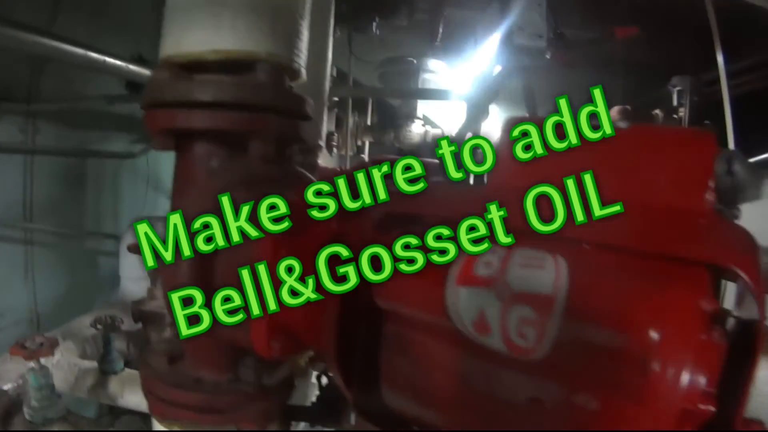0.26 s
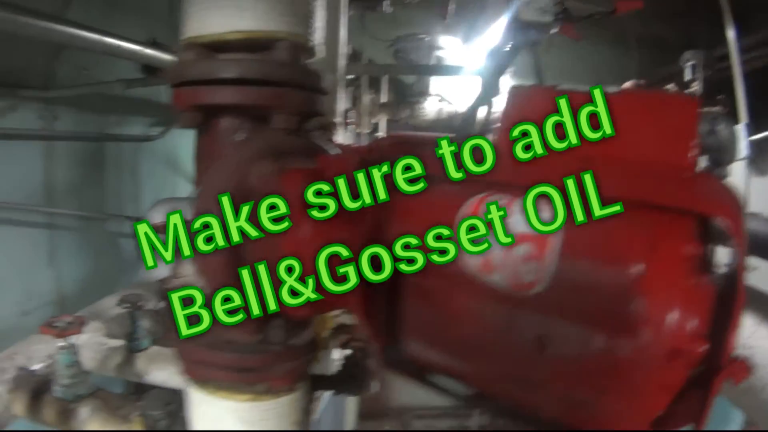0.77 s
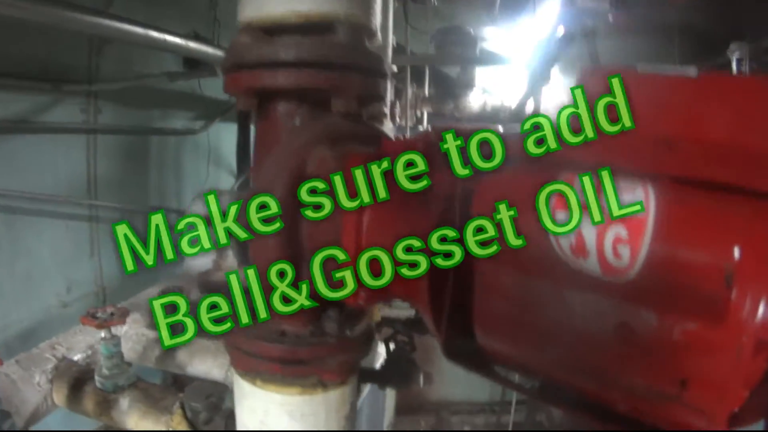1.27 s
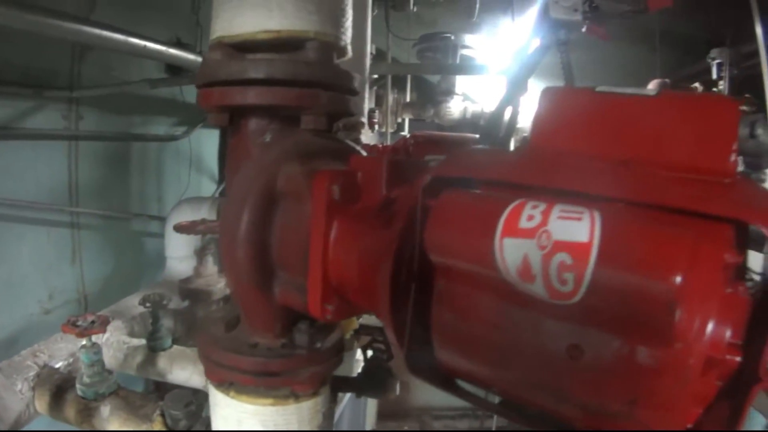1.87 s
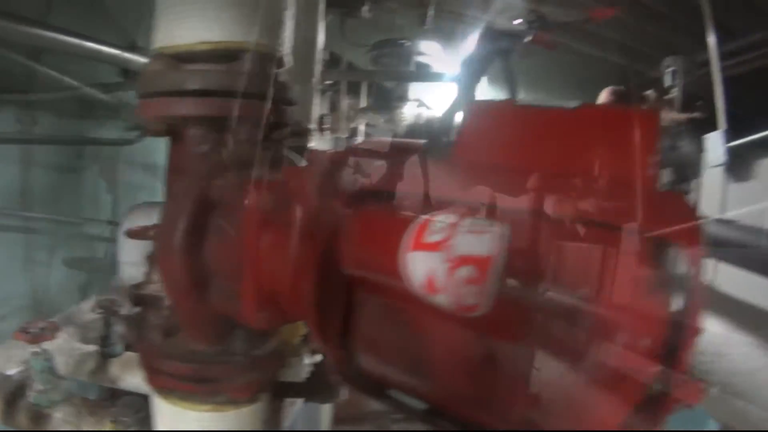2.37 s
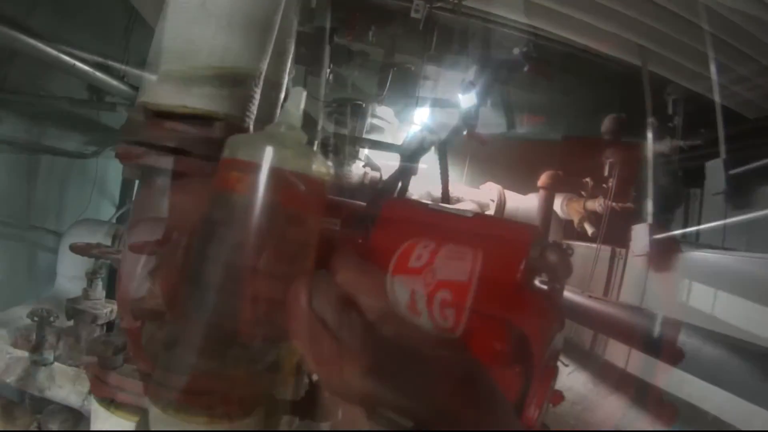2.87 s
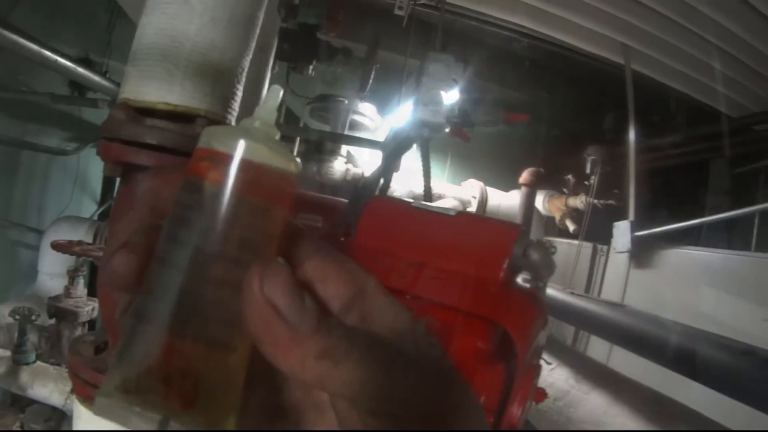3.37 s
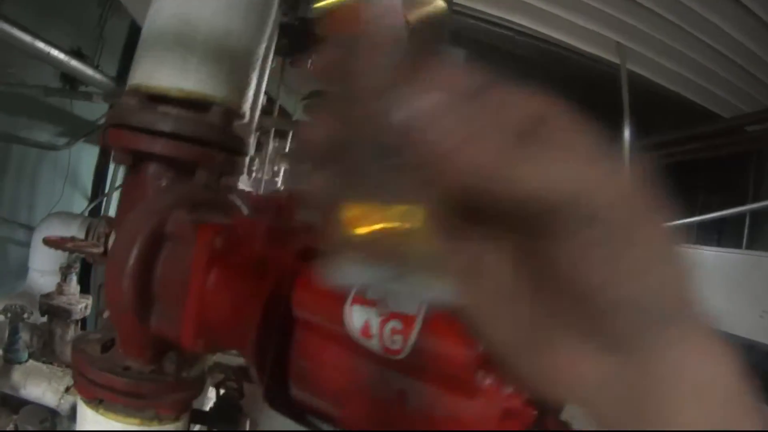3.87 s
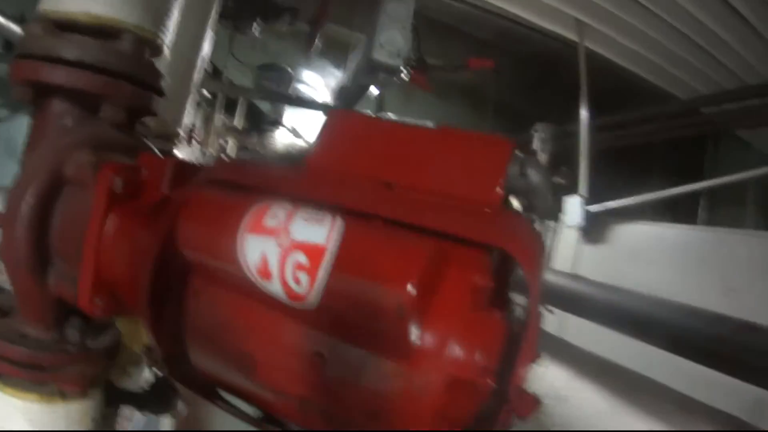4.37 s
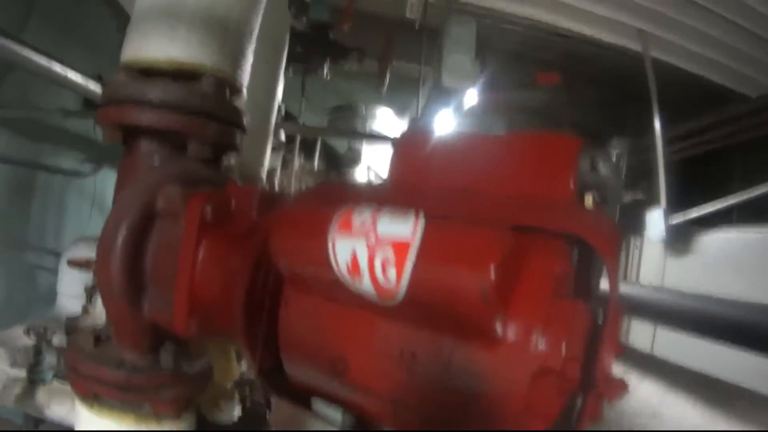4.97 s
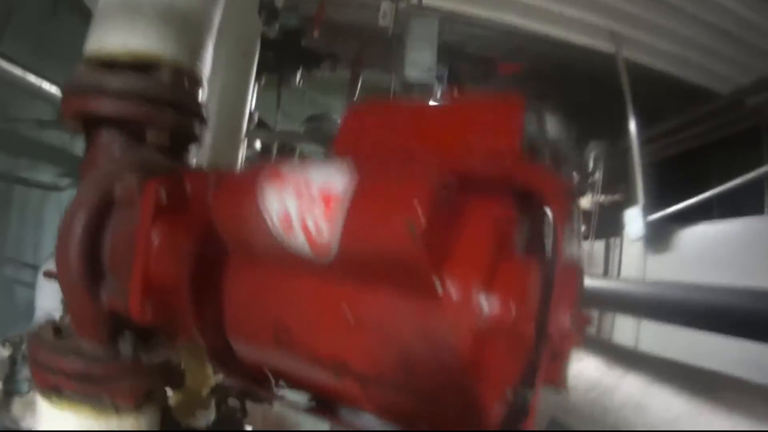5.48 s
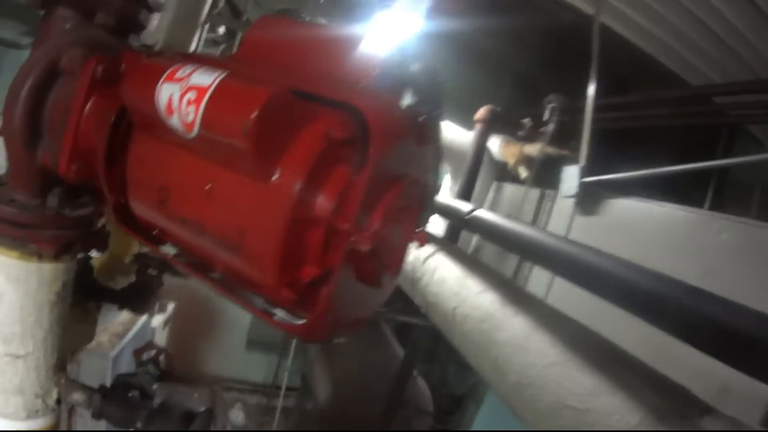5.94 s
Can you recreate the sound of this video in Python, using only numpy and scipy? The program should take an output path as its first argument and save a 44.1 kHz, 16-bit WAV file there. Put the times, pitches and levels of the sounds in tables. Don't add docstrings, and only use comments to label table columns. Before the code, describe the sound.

In a hard, echoing mechanical room, circulator pumps run with watery hiss, low motor hum, faint whine and a bearing rasping about three times a second. A tool clatters near the start, with a lighter tap after. The pump sound softens as the viewpoint changes, fingers tap and rub the hand-held camera, then loud knocks and clicks burst close up. A tiny silence follows before the pumps return.

```python
import sys
import numpy as np
from scipy import signal
from scipy.fft import rfft, irfft, next_fast_len
from scipy.io import wavfile
from scipy.ndimage import uniform_filter1d

SR = 44100
rng = np.random.default_rng(int(sys.argv[2]) if len(sys.argv) > 2 else 0)


def materialize(psi):
    bounded = np.clip(np.atleast_2d(psi).T, -1, 1)
    quanta = np.round(bounded * 32767).astype(np.int16)
    wavfile.write(sys.argv[1], SR, quanta)


def boost_factor(decibels):
    exponent = np.asarray(decibels, float) / 20
    return 10 ** exponent


N = 273861
T = np.arange(N) / SR
M = next_fast_len(N + SR // 4)
F = np.fft.rfftfreq(M, 1 / SR) + 1
SIDE = np.array([[.5], [-.5]])


def curve(table):
    s, level = np.transpose(table)
    return np.interp(T, s, level)


def along(table):
    hz, *columns = np.transpose(table)
    return [np.interp(np.log(F), np.log(hz), c) for c in columns]


def unit(x):
    return x / np.sqrt(np.mean(x ** 2))


def ramp(s, length):
    return np.clip((T - s) / length, 0, 1)


def lopsided(u, rise, fall):
    return np.exp(-(u / np.where(u < 0, rise, fall)) ** 2)


def modes(table):
    return sum(boost_factor(db) ** 2 / (1 + (2 * (F - hz) / width) ** 2) ** 2 for hz, width, db in table)


def shaped(x, power):
    return irfft(rfft(x, M) * np.sqrt(power), M)[..., :N]


def walk(rate):
    k = int(SR / rate)
    held = np.repeat(rng.standard_normal(N // k + 1), k)
    return unit(uniform_filter1d(held, k)[:N])


def noises():
    return rng.standard_normal((3, N))


def band_noise(grit, low_hz, high_hz, order=2):
    band = signal.butter(order, [low_hz, high_hz], "band", fs=SR, output="sos")
    return signal.sosfilt(band, grit)


def add(out, s, sound):
    i = max(int(s * SR), 0)
    out[..., i:i + sound.shape[-1]] += sound[..., :N - i]


# (frequency [Hz], coherence [0-1], left leads [rad], left minus right [dB])
PORT_PAIR = [(29.6, 1, 0.19, -22), (120, 0.98, -0.23, 4.5), (250, 0.93, -0.84, 0), (500, 1, -1.64, -0.5),
             (970, 0.03, -1.04, -2), (1580, 0.74, -0.54, -4), (2230, 0.6, -0.88, -1),
             (3200, 0.61, -0.25, -3), (5240, 0.94, -0.41, -2), (8450, 0.2, 1, 0), (9750, 0.99, 0.89, 0)]


def ports(shared, left, right):
    like, lead, pan_db = along(PORT_PAIR)
    like = np.clip(like, 0, 1)
    turn = np.array([np.exp(.5j * lead), np.exp(-.5j * lead)])
    both = np.sqrt(like) * rfft(shared, M) * turn
    both = both + np.sqrt(1 - like) * rfft([left, right], M)
    return irfft(both * boost_factor(SIDE * pan_db), M)[:, :N]


# (frequency [Hz], density [dB per Hz])
WATER_HISS = [(12, -51), (20, -21.5), (117, -11), (198, -13), (327, -11.5), (781, -16.5), (939, -14.5),
              (1190, -13.5), (1470, -3), (1680, -9), (1960, -7), (3420, -13), (4810, -8.5), (7740, -18.5),
              (10900, -14), (14200, 40), (22000, -120)]
# (frequency [Hz], width [Hz], level over the hiss [dB])
CASING_MODES = [(121, 22, 7), (184, 90, -2.5), (942, 24, 7), (1060, 12, -1), (721, 14, 4), (2500, 25, 1.5),
                (2820, 14, 2), (1527, 71, 1), (1570, 14, -12), (1912, 150, 4), (2000, 110, 4.5),
                (2128, 130, 5), (2250, 200, 1.5), (3177, 250, 2.5), (6820, 2000, -3.5), (9450, 420, 3),
                (11190, 1600, 3.5)]
RING_DB = -.5
HUM_DB, HUM_NEARER_DB = -4.5, -0.5
CROSS_S, CROSS_LENGTH_S = 2.9, 0.43


def casing_hiss():
    hum_db = HUM_DB + HUM_NEARER_DB * ramp(CROSS_S, CROSS_LENGTH_S)
    smooth = boost_factor(along(WATER_HISS)[0]) ** 2
    scale = 1 / np.sqrt(np.mean(smooth * (F > 5600) * (F < 9000)))
    noise = rfft(ports(*noises()), M) * np.sqrt(smooth * (1 + modes(CASING_MODES)))
    swell, out = walk(12), 0
    for hz in 25 * 2 ** np.arange(0, 9, .5):
        band = np.clip(1 - np.abs(2 * np.log2(F / hz)), 0, 1)
        share_db = hum_db if hz < 700 else RING_DB if hz < 3500 else 0
        flicker_db = .5 * swell + 1.27 * walk(14)
        out = out + boost_factor(share_db + flicker_db) * irfft(noise * band, M)[:, :N]
    return scale * out


# (frequency [Hz], width [Hz], level [dB])
BEARING_MODES = [(4820, 53, -1), (4780, 260, 2.5), (4950, 90, 0), (5200, 100, -7), (4315, 60, -2.5),
                 (4630, 70, 1)]
# (from time [s], a rasp begins at [s])
BEAT_PHASE = [
    (0, -.055),
    (3.3, 3.435),
    (4.84, 4.66),
    (4.96, 5.045),
    (5.3, 5.34),
    (5.545, 5.5),
    (5.72, 5.815),
    (6.0, 5.93),
    (6.065, 5.82),
    (6.09, 6.16),
]
BEAT_HZ = 3.105
RASP_SAG_DB = -3.5


def bearing_rasp():
    phase = np.array(BEAT_PHASE)
    start = phase[np.searchsorted(phase[:, 0], T, side="right") - 1, 1]
    turn = (T - start) * BEAT_HZ % 1
    beat = np.clip(turn / .07, 0, 1) * np.clip((.72 - turn) / .22, 0, 1)
    beat = beat * boost_factor(1.5 * walk(40) + RASP_SAG_DB * (turn - 0.28))
    return beat * unit(shaped(ports(*noises()), modes(BEARING_MODES)))


# (frequency [Hz], level [dB rms])
MOTOR_TONES = [(118.4, -56), (946, -54.5), (1453, -46), (2164, -49), (2320, -52.5), (2805, -67)]
TONE_WAVER_DB, TONE_WANDER = 4, .002


def motor_tones():
    tones = np.zeros(N)
    for hz, db in MOTOR_TONES:
        level = boost_factor(db + 1 + TONE_WAVER_DB * walk(11))
        cycles = np.cumsum(hz * (1 + TONE_WANDER * walk(12))) / SR
        tones += level * np.sin(2 * np.pi * cycles)
    return ports(tones, tones, tones)


# (time [s], level [dB])
PLANT_LEVEL = [(0.0, -41), (1.61, -41.5), (1.89, -40.5), (2.06, -44), (3.08, -51.5), (3.54, -52.5),
               (3.92, -48), (4.22, -43), (4.7, -42.5), (5.02, -41), (5.18, -41.5), (5.35, -42.5),
               (5.65, -46), (5.95, -46), (6.05, -44.5), (6.21, -42.5)]


def pumps():
    sources = boost_factor(0.27) * casing_hiss() + boost_factor(4.0) * bearing_rasp() + boost_factor(39.0) * motor_tones()
    return boost_factor(curve(PLANT_LEVEL)) * sources


# (time [s], peak [dB], room t60 [s])
TOOL_IMPACTS = [
    (0.6525, -19, 0.14),
    (0.6705, -7.5, 0.39),
    (0.683, -13, 1),
    (.719, -25, 0.49),
    (1.034, -22, 0.28),
    (1.062, -29, 0.82),
]
# (frequency [Hz], width [Hz], level [dB])
TOOL_MODES = [(800, 130, -18.5), (1400, 240, -4.5), (2160, 700, -0.5), (2910, 1140, -11),
              (4230, 1500, -13.5), (5430, 2100, -15.5), (8100, 7800, -24.5)]
FLUTTER_S, FLUTTER_SHARE, FLUTTER_SLAP_S = .0118, .8, .004


def clatter():
    drive, t = np.zeros(N), T[:SR]
    slaps = 1 + FLUTTER_SHARE * np.exp(-(t % FLUTTER_S) / FLUTTER_SLAP_S)
    for s, db, t60 in TOOL_IMPACTS:
        decay = boost_factor(-60 * t / t60) + boost_factor(-60 * t / 0.052)
        add(drive, s, boost_factor(db - 2.5) * slaps * decay)
    noise = noises() * boost_factor(walk(300))
    return ports(*shaped(drive * noise, modes(TOOL_MODES)))


TAP_PAN_DB, TAP_PAN_DB_OCT = -1, -1.5
TAP_LEAD_RAD, TAP_LEAD_RAD_OCT = -1.3, -0.051


def rings(table):
    out, t = np.zeros((2, N)), T[:SR // 20]
    for s, db, hz, cycles in table:
        u = t * hz / cycles
        lead = TAP_LEAD_RAD + TAP_LEAD_RAD_OCT * np.log2(hz / 600)
        ring = np.sin(2 * np.pi * hz * t + SIDE * lead)
        add(out, s, boost_factor(db - 1.5 * SIDE) * (u * np.exp(1 - u)) ** 2.43 * ring)
    return out


# (time [s], peak [dB], ring [Hz], cycles to full swing)
TOOL_RINGS = [(0.6526, -22, 2100, 1), (0.6703, -8, 2600, 0.55), (.6712, -13, 4300, 2), (.672, -13, 2250, 4),
              (.6765, -18, 2200, 3), (0.6824, -9, 2000, 0.87), (0.6848, -12, 2100, .8),
              (0.6868, -13, 2600, 2), (.688, -17, 5000, 5), (.6915, -17, 3900, 4), (.693, -19, 5900, 4),
              (0.7025, -16, 1900, 2), (0.7225, -17, 2300, 3), (0.741, -19, 1900, 1.5),
              (0.754, -19, 1900, 2), (1.1035, -25, 2000, 3)]


def bounces():
    return rings(TOOL_RINGS)


# (time [s], effort [dB])
GRIP_EFFORT = [(3.2, -49), (3.48, -50), (3.85, -60.5), (4.02, -41.5), (4.31, -48.5), (4.55, -61),
               (4.75, -32.5), (4.88, -27), (5.02, -45), (5.2, -38), (5.37, -30), (5.62, -35.5), (5.72, -41),
               (5.94, -50.5), (6.21, -48)]
RUMBLE_DB, RUMBLE_SLOPE = -49.5, 0.74


def rub():
    rustle_db = curve(GRIP_EFFORT)
    rumble_db = RUMBLE_DB + RUMBLE_SLOPE * (rustle_db + 44.5)
    on = ramp(GRIP_EFFORT[0][0], 0.043)
    slow = ports(*noises() * boost_factor(4.0 * walk(40)))
    quick = ports(*noises() * boost_factor(2.0 * walk(230)))
    rumble = unit(shaped(slow, modes([(70, 210, 8.1), (175, 79, 6.7)])))
    rustle = unit(shaped(quick, modes([(284, 660, -34), (800, 1260, 19), (1900, 1200, -29.5)])))
    return on * (boost_factor(rumble_db) * rumble + boost_factor(rustle_db) * rustle)


# (time [s], length [s],
# level [dB], centre [Hz])
SKIN_DRAGS = [(1, 0.12, -36, 1070), (2.551, 0.018, -48.5, 402), (1.995, 0.021, -37, 560),
              (2.107, 0.015, -38.5, 380), (3.277, 0.011, -39.5, 250), (3.526, 0.026, -38.5, 196),
              (3.947, 0.024, -44, 500), (4.043, 0.037, -49, 148), (4.137, 0.056, -34, 237),
              (4.138, 0.034, -37, 800), (4.191, 0.038, -34.5, 199), (4.268, 0.023, -43, 100),
              (4.786, 0.028, -28.5, 1860), (4.838, 0.049, -27.5, 1400), (4.862, 0.047, -25, 120),
              (5.209, 0.023, -22, 148), (5.289, 0.033, -22.5, 1400), (5.566, 0.041, -41, 170),
              (5.565, 0.042, -33, 1300), (5.642, 0.06, -31, 1070), (5.665, 0.034, -31.5, 146),
              (5.745, 0.052, -43, 108), (5.965, 0.083, -36, 910), (6.004, 0.046, -37, 4940),
              (6.165, 0.12, -39, 5300)]


def scrapes():
    out, t = np.zeros((2, N)), T[:SR // 8]
    for s, length, db, hz in SKIN_DRAGS:
        grit = rng.standard_normal((2, len(t)))
        drag = np.sin(np.pi * np.clip(t / length, 0, 1))
        noise = band_noise(grit[0] + 1.37 * SIDE * grit[1], 0.64 * hz, 1.92 * hz)
        add(out, s, boost_factor(db) * drag * unit(noise))
    return out


# (time [s], peak [dB], push length [s], left minus right [dB])
SHELL_PUSHES = [(2.011, -37, 0.0035, -1), (2.119, -36, 0.0025, 1), (2.562, -39.5, 0.0023, 2),
                (3.346, -39, 0.0056, 1.5), (3.445, -32, 0.0022, 2), (3.528, -30, 0.0022, 5),
                (3.568, -39, 0.0053, 9), (3.626, -36, 0.0022, 5), (3.649, -37, 0.0038, 5.5),
                (3.802, -34, 0.0016, 8), (3.894, -38, 0.0025, 10), (4.055, -32, 0.0037, 4),
                (4.152, -29, 0.0039, 1), (4.218, -25.5, 0.0061, 2), (4.287, -28.5, 0.0099, 0),
                (4.8098, -11, 0.0063, 5.5), (4.872, -19, 0.0044, 2), (4.893, -17, .005, 4),
                (4.962, -8.5, 0.0051, 7), (5.231, -20, 0.0049, 5), (5.286, -18, 0.0043, 2),
                (5.39, -27, .005, 2), (5.671, -31, 0.0054, 3), (5.759, -28, 0.0059, 2),
                (5.982, -24.5, .0041, 1)]


def thumps():
    out, t = np.zeros((2, N)), T[:SR // 8]
    for s, db, length, pan_db in SHELL_PUSHES:
        u = (t - .04 - 0.00081 * SIDE) / np.clip(0.54 * length, .001, .012)
        swing = np.exp(-u ** 2) - 0.62 * np.exp(-(u / 1.7 - 1.0) ** 2)
        add(out, s - .04, boost_factor(db + SIDE * pan_db) * swing)
    return out


# (time [s], peak [dB], ring [Hz])
LIGHT_TAPS = [(1.989, -21, 562), (3.025, -32, 680), (3.277, -37, 300), (3.284, -32, 900),
              (3.3655, -32, 454), (3.44, -32.5, 404), (3.447, -34, 970), (3.463, -41, 200), (3.6, -39, 250),
              (3.56, -29, 262), (3.579, -33, 900), (3.614, -35, 900), (3.829, -35, 750),
              (3.526, -30.5, 1800), (3.997, -28.5, 350), (4.154, -39, 553), (4.161, -34, 380),
              (4.165, -23, 281), (4.176, -28, 1480), (4.2, -26, 298), (4.214, -21, 328), (6.0, -29, 1100),
              (6.017, -29, 890)]
LIGHT_CRACK_DB = -18
# (time [s], peak [dB], ring [Hz], bright crack [dB])
FIRM_KNOCKS = [(4.716, -14.5, 902, -15), (4.722, -21, 800, -15), (4.799, -15, 2020, -12),
               (4.85, -24, 1080, -6), (4.871, -22, 930, -14), (4.899, -17, 366, -6), (4.966, -20, 500, -25),
               (4.965, -10.5, 976, -21), (5.2437, -13.5, 396, -29), (5.297, -20, 405, -20),
               (5.37, -24, 613, -25), (5.393, -21, 790, -20), (5.402, -25, 590, -20),
               (5.443, -20, 790, -14), (5.451, -20, 294, -24), (5.455, -24, 600, -24),
               (5.649, -24, 900, -15), (5.664, -23.5, 900, -20), (5.703, -24, 1160, -8),
               (5.728, -27, 1300, -13)]
CRACK_BAND = [1360, 2410]


def taps():
    out, t = np.zeros((2, N)), T[:SR // 8]
    force = t / .0013 * np.exp(1 - t / .0013)
    force = force + 0.1 * boost_factor(-60 * t / 0.24) * np.clip(t / 0.0081, 0, 1)
    light = [(*row, LIGHT_CRACK_DB) for row in LIGHT_TAPS]
    for s, db, hz, crack_db in light + list(FIRM_KNOCKS):
        octaves = np.log2(hz / 600)
        pan_db = TAP_PAN_DB + TAP_PAN_DB_OCT * octaves
        lead = TAP_LEAD_RAD + TAP_LEAD_RAD_OCT * octaves
        grit = rng.standard_normal((2, len(t)))
        grit = grit[0] + 1.2 * SIDE * grit[1]
        knock = unit(band_noise(grit, .45 * hz, 1.55 * hz, order=3))
        crack = unit(band_noise(grit, *CRACK_BAND, order=3))
        tone = np.sin(2 * np.pi * hz * t + SIDE * lead)
        ring = 0.71 * tone + 0.3 * knock + 0.59 * boost_factor(crack_db) * crack
        add(out, s + 0.0013, boost_factor(db + SIDE * pan_db) * force * ring)
    return out


# (time [s], peak [dB], centre [Hz], length [s])
PLASTIC_CLICKS = [(0.651, -20, 4600, .003), (0.6705, -15, 5000, .003), (6.2045, -16, 4700, .003),
                  (3.281, -25, 4520, 0.003), (3.285, -22.5, 4790, 0.003), (3.543, -28, 4940, 0.003),
                  (3.9, -26, 5100, 0.003), (4.3, -17, 4300, .002), (4.797, -15, 4700, 0.003),
                  (4.7997, -9, 5400, 0.003), (4.798, -13.5, 10400, .0012), (4.9317, -5, 5400, 0.0019),
                  (4.93, -10, 1700, .004), (5.21, -13, 2800, 0.0024), (5.2158, -9, 4800, 0.0016),
                  (5.2157, -25, 8800, .001), (5.2518, -5.5, 3200, 0.003), (5.2515, -11, 5600, .001),
                  (5.2535, -10, 1500, 0.0035), (5.291, -5.5, 1650, 0.0039), (5.2942, -9, 5030, 0.0013),
                  (5.2986, -3, 3980, 0.0054), (5.2988, -6, 6200, 0.0027), (5.2984, -6, 1630, 0.004),
                  (5.7, -20, 2100, 0.0052), (5.311, -16, 5200, 0.0062), (5.578, -21, 4900, 0.02),
                  (5.598, -22, 5200, 0.0027)]


def clicks():
    out, t = np.zeros((2, N)), T[:SR // 8]
    for s, db, hz, length in PLASTIC_CLICKS:
        grit = rng.standard_normal((2, len(t)))
        crack = band_noise(grit[0] + 1.44 * SIDE * grit[1], 0.83 * hz, min(1.18 * hz, SR / 3))
        burst = lopsided(t - .01, .2 * length, length)
        add(out, s - .01, boost_factor(db - 2.0) * burst * crack)
    return out


# (time [s], peak [dB])
BOTTLE_TAPS = [
    (5.3695, -16),
    (5.446, -27),
    (5.456, -24),
    (5.47, -28),
]
# (frequency [Hz], level [dB], t60 [s])
BOTTLE_MODES = [(630, -2.5, 0.14), (788, -8, 0.17), (880, -12, 0.073), (395, -5, 0.045)]


def bottle():
    out, t = np.zeros((2, N)), T[:SR // 8]
    for s, db in BOTTLE_TAPS:
        for hz, mode_db, t60 in BOTTLE_MODES:
            decay = boost_factor(db + mode_db - 60 * t / t60)
            add(out, s, decay * np.sin(2 * np.pi * hz * t - 1.0 * SIDE))
    return out


def hand():
    handling = rub() + scrapes() + thumps() + taps() + clicks() + bottle()
    return shaped(handling, 1 / (1 + (45 / F) ** 4))


# (time [s], peak [dB], ring [Hz], cycles to full swing)
CLEAN_SNAPS = [(5.682, -29, 160, 1.5), (5.749, -30, 120, .5), (5.776, -35, 200, 1), (4.912, -22, 150, .4),
               (1.9882, -16, 830, 1.2), (1.99, -21, 1470, 2), (2.0078, -24, 500, 0.34),
               (3.28, -25.5, 980, 1.3), (3.2816, -25.5, 1520, 2.5), (3.445, -27, 1500, 1.3),
               (3.577, -23, 900, 0.46), (3.6045, -27, 900, .4), (3.651, -33, 500, .3),
               (3.9565, -25.5, 1000, 1), (4.2158, -22, 950, 1.3), (1.0125, -19, 1840, 1),
               (1.0321, -11, 2250, 2.2), (1.0332, -23, 1300, 1), (4.7137, -8, 1900, 0.8),
               (4.714, -6, 805, 0.85), (4.7162, -5.5, 1400, 0.82), (4.7179, -19, 1000, 0.76),
               (4.9502, -13, 900, .7), (4.9537, -8.5, 263, 0.58), (5.044, -29.5, 110, 0.65),
               (5.081, -24, 1400, 6.5), (5.5577, -18, 604, 0.67), (5.655, -24, 1440, 3),
               (5.769, -33, 170, 0.42), (4.885, -6, 686, 0.69), (4.9267, -3.5, 1440, 0.5),
               (4.9278, -25, 1900, 0.89), (4.958, -1, 1700, 0.57), (4.9607, -13, 1900, 1.1),
               (4.9637, 0.5, 1100, 0.73), (5.226, -7, 610, 0.69), (5.2275, -15, 1100, .6),
               (5.2295, -18, 710, 0.44), (5.2458, -20, 400, .4), (5.2514, -10, 3200, .5),
               (5.2525, -17.5, 3170, 6.6), (5.2518, -12, 1100, .3), (5.2998, -9, 5800, 1),
               (5.3104, -13, 3000, 1), (5.404, -19, 250, 0.37), (5.452, -20, 300, 0.46),
               (5.3687, -9.5, 1200, 0.32), (5.677, -17, 1200, 1.9), (5.6813, -23, 1300, 2.3)]


def snaps():
    return rings(CLEAN_SNAPS)


# (time [s], peak [dB], build-up [s], rebound [0-1])
SHELL_JOLTS = [
    (5.2078, -.5, .0012, .27),
    (5.3056, -2.5, .002, .1),
]


def jolts():
    out, u = np.zeros((2, N)), T[:SR // 20] - .02
    for s, db, build, rebound in SHELL_JOLTS:
        left = lopsided(u, build, .0004) - rebound * lopsided(u - .001, .0004, .005)
        right = .52 * lopsided(u + .0013, build / 2, .0006) - .5 * lopsided(u - .0003, .0006, .002)
        add(out, s - .02, boost_factor(db) * np.array([left, right]))
    return out


def scene():
    return pumps() + clatter() + bounces() + hand() + snaps() + jolts()


# (time [s], depth [dB], hold [s])
LIMITER_DUCKS = [
    (4.935, -5, .01),
    (4.937, -5, 0.05),
    (5.2478, -18, 0.003),
    (5.603, -2, 0.035),
]
FADE_OUT_S, FADE_OUT_LENGTH_S, FADE_OUT_DB = 5.482, .02, -13
MUTE_S, MUTE_DB, MUTE_TAIL_S, MUTE_TAIL_DB = 5.5238, -14, .022, -40
UNMUTE_S, FADE_IN_LENGTH_S, UNMUTE_SHARE = 5.557, 0.016, 0.084


def gain():
    duck_db = np.zeros(N)
    for s, depth_db, hold in LIMITER_DUCKS:
        release = ramp(s + 0.66 * hold, 0.59 * hold)
        duck_db += depth_db * ramp(s, 0.001) * (1 - release)
    out_db = FADE_OUT_DB * ramp(FADE_OUT_S, FADE_OUT_LENGTH_S) + MUTE_DB * (T > MUTE_S)
    out_db = out_db + MUTE_TAIL_DB * ramp(MUTE_S, MUTE_TAIL_S) ** 3
    back = UNMUTE_SHARE + (1 - UNMUTE_SHARE) * ramp(UNMUTE_S, FADE_IN_LENGTH_S)
    return boost_factor(duck_db) * (boost_factor(out_db) + (T > UNMUTE_S) * back)


def top_cut(x):
    return signal.sosfilt(signal.butter(12, 11460, fs=SR, output="sos"), x)


def record(dry):
    slope = np.clip((SR / 4 + 15 - F) / 60, 0, 1) ** 4
    leak = boost_factor(-45 - (F - SR / 4) / 30) ** 2 * (F > SR / 4)
    mix = shaped(np.clip(dry * gain(), -.97, .97), slope + leak)
    return top_cut(mix)


dry = scene()
out = record(dry)
materialize(out)
```